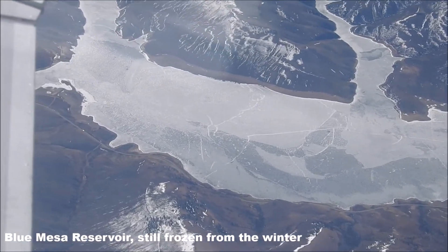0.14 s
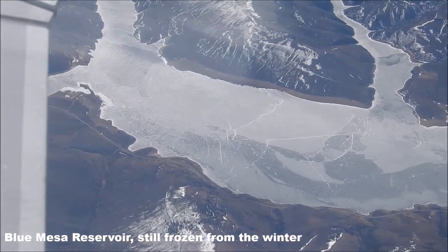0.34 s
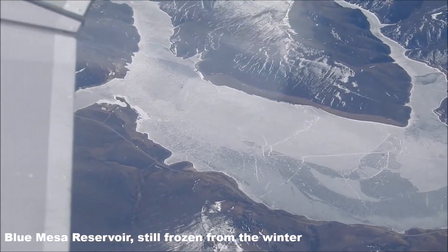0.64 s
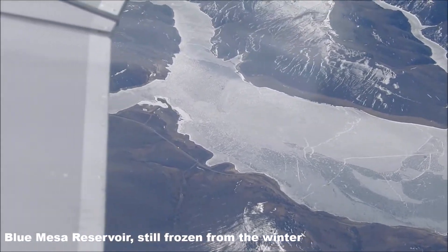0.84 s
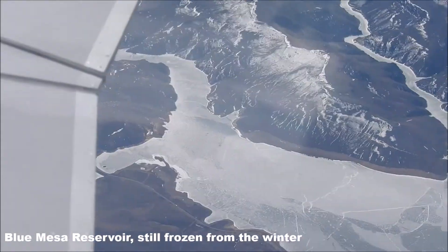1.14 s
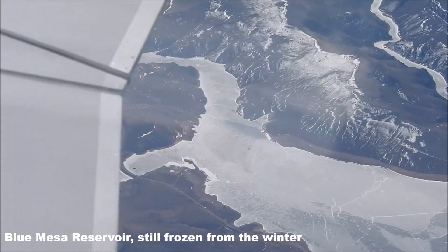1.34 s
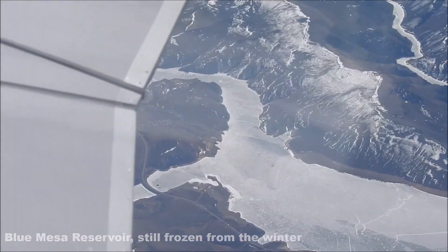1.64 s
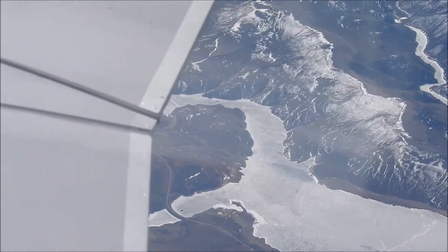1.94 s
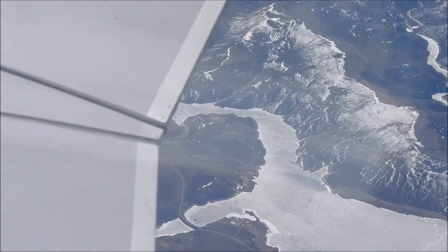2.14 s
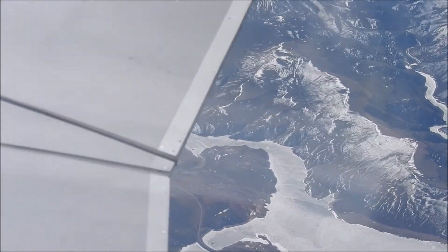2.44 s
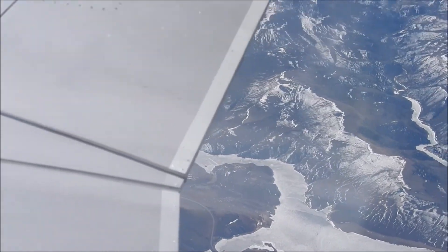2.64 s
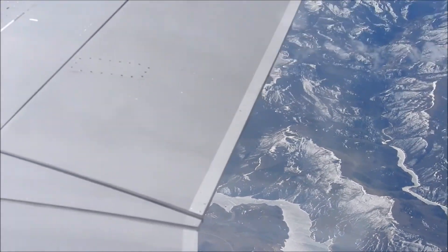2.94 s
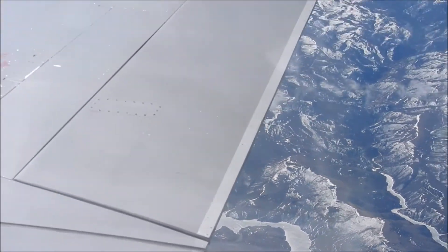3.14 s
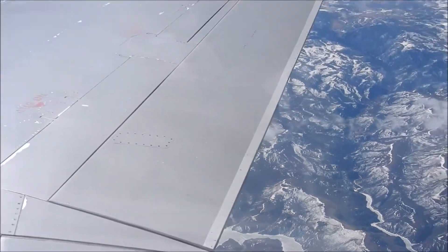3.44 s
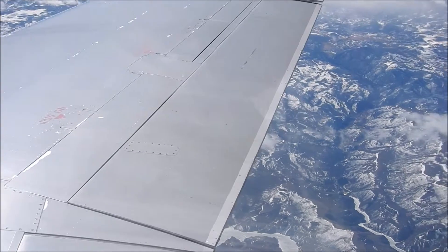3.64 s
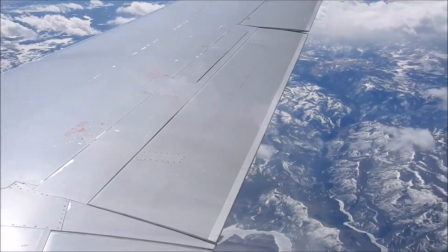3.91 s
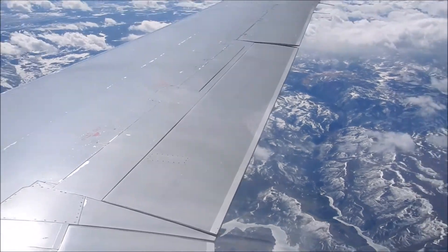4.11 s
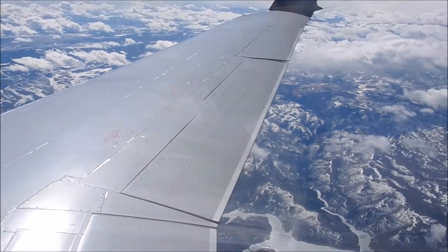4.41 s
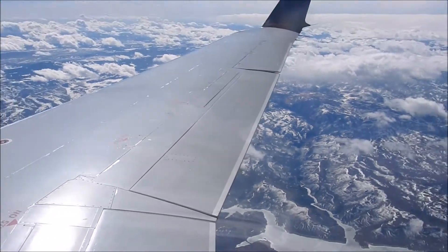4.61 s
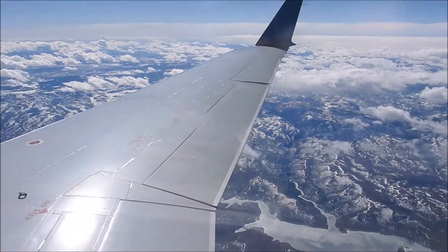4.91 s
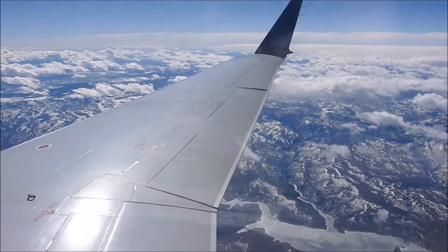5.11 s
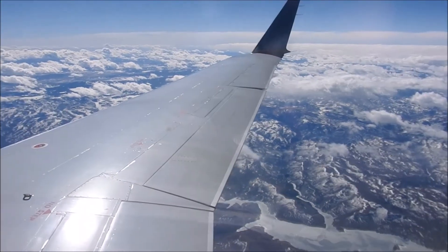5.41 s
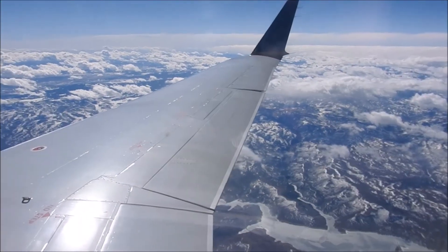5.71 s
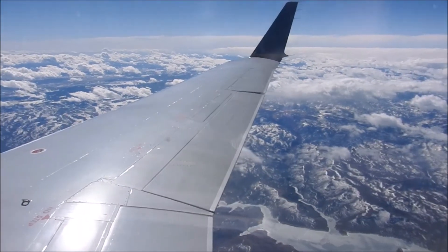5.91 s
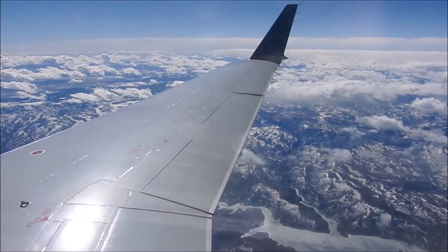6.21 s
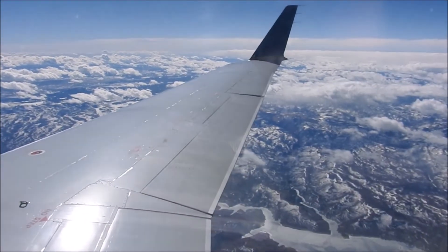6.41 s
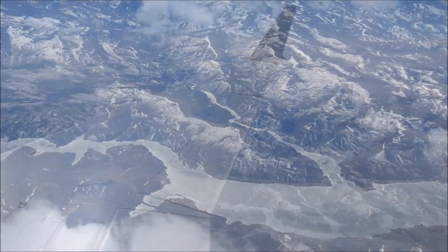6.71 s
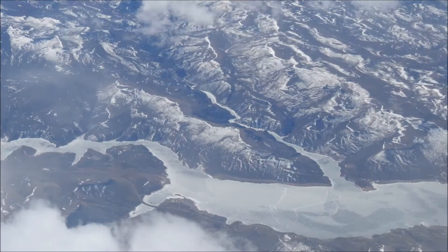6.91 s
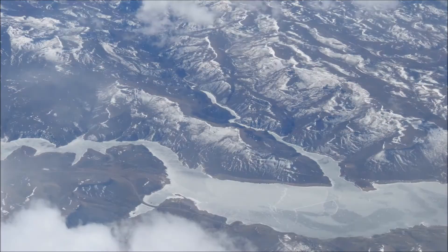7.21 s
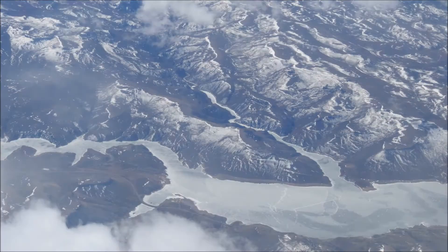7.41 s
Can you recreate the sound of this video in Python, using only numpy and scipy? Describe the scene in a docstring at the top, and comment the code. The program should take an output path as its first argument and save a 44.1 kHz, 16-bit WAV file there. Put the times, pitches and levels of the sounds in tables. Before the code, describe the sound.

Steady jet cabin noise: heavy rushing air, deep humming engines and thin vent hiss, slightly gritty, fading to silence after two faint scuffs.

```python
"""A window seat in a small jet at cruise: dull airflow roar, engine drone, vent hiss with a faint whine.
Roar, rush and hiss are shaped noise through cabin resonances; the drone is four fluttering sines.
A brief squeak and two soft scuffs are short noise bursts. Crests are gritty, rounded and crackle
slightly; the scuffs pass as the whole sound is faded out."""
import sys
import numpy as np
from scipy import signal
from scipy.fft import rfft, irfft
from scipy.io import wavfile
from scipy.ndimage import uniform_filter1d

SR = 44100
rng = np.random.default_rng(int(sys.argv[2]) if len(sys.argv) > 2 else 0)


def pcm_store(signal):
    """Save signal as 16-bit PCM."""
    levels = np.round(np.clip(np.atleast_2d(signal), -1, 1) * 32767)
    wavfile.write(sys.argv[1], SR, levels.astype(np.int16).T)


N = 332955

# faint squeak of the cabin trim: (time [s], length [s], frequency [Hz], width [Hz], level [dB])
TRIM_SQUEAK = (3.222, .04, 3220, 160, -44)
# soft scuffs, before the fade: (time [s], length [s], level [dB])
SCUFFS = [(5.811, 0.045, -27), (6.307, 0.049, -25)]
# scuff spectrum shape: (frequency [Hz], relative level [dB])
SCUFF_COLOUR = [(400, -2), (1100, 7.5), (2200, -3), (3200, -10.5), (4500, -16), (8000, -27), (15000, -39)]
# vent hiss before resonances: (frequency [Hz], density [dB per Hz])
VENT_SPECTRUM = [(1500, -97.5), (3000, -81), (3600, -93.5), (4100, -87), (4500, -80), (5500, -88.5),
                 (5950, -83), (6900, -88.5), (8000, -95.5), (9200, -101), (15500, -108)]
# rush of opposite sign left and right, before whistles: (frequency [Hz], density [dB per Hz])
DIFFUSE_SPECTRUM = [(30, -89), (120, -75), (500, -69), (1200, -69), (1400, -74), (2150, -77), (2450, -83),
                    (2900, -85.5), (3500, -98.5), (4500, -86), (5400, -89), (6000, -83.5), (7000, -86),
                    (8200, -114)]
# broad resonances of cabin and panels: (frequency [Hz], width [Hz], lift [dB])
CABIN_MODES = [(189, 28, 4), (212.6, 27, 4), (389.3, 26, 4.5), (649.7, 41, 5.5), (1250, 100, 1.5),
               (1580, 150, 3), (1995, 250, 5), (3250, 160, 3), (6660, 100, 5.5)]
# thin whistles in the air system: (frequency [Hz], width [Hz], lift [dB])
WHISTLE_MODES = [(3690, 35, 3), (3780, 35, 4), (3870, 35, 5), (3977, 26, 9), (6790, 14, 10)]
# engine tones: (frequency [Hz], rms level [dB], flutter [dB], phase wander [rad])
ENGINE_TONES = [(101.85, -17.4, 1, .1), (256.23, -15.5, .5, .05), (305.6, -38, 2, .5),
                (512.46, -38.5, 2, .4)]
# airflow through the cabin wall, before resonances: (frequency [Hz], density [dB per Hz])
ROAR_SPECTRUM = [(15, -63), (40, -52.5), (66, -46), (118, -39.5), (150, -42), (290, -46), (440, -45),
                 (540, -50), (780, -50.5), (1080, -60), (1750, -69), (2200, -71), (3600, -85), (8000, -112)]
# tick spectrum shape: (frequency [Hz], gain [dB])
TICK_COLOUR = [(400, -7.5), (1500, 15), (4000, 16), (8000, 7), (12000, 3), (15500, 1)]
# clearest ticks of the crackle: (time [s])
CLEAR_TICKS_S = [0.236, 1.1, 2.561, 3.33, 3.576, 4.712]

LEFT_MINUS_RIGHT_DB = -0.97
FADE_START_S, FADE_END_S, STOP_S = 2.72, 6.775, 6.752
TOP_HZ = 15750
# crackle: heights with full scale 1, pulse levels before the tick colour
FAINT_HEIGHT, FAINT_TICK_DB = 0.46, -42.5
BRIGHT_HEIGHT, BRIGHT_TICK_DB = 0.875, -24.5
FAINT_SCATTER_DB = 3

TIME_S = np.arange(N) / SR
FREQ_HZ = np.fft.rfftfreq(N, 1 / SR)


def undb(db):
    """Decibels to amplitude gain."""
    return 10 ** (np.asarray(db) / 20)


def slope(points):
    """Gain at every frequency from (Hz, dB) points joined on a log axis."""
    hz, db = np.transpose(points)
    return undb(np.interp(np.log(FREQ_HZ + 1e-9), np.log(hz), db))


def resonances(modes):
    """Gain at every frequency from bell-shaped lifts; width spans half the dB lift."""
    lift_db = sum(db * 2 ** -(2 * (FREQ_HZ - hz) / width_hz) ** 2 for hz, width_hz, db in modes)
    return undb(lift_db)


def noise(gain):
    """Random noise with the given amplitude per root Hz."""
    white = rfft(rng.standard_normal(N))
    return irfft(white * gain, N) * np.sqrt(SR / 2)


def walk(rate_hz):
    """Smooth random motion with rms 1, moving about rate_hz times a second."""
    y = noise(np.exp(-(FREQ_HZ / rate_hz) ** 2))
    return y / np.sqrt(np.mean(y ** 2))


def squeak():
    """A plastic panel slips for a moment and rings in one narrow band."""
    start_s, length_s, hz, width_hz, db = TRIM_SQUEAK
    ring = noise(np.exp(-(2 * (FREQ_HZ - hz) / width_hz) ** 2))
    swell = np.exp(-(2 * (TIME_S - start_s) / length_s) ** 2)  # centred on start_s
    return undb(db) * ring / np.std(ring) * swell


def scuffs():
    """Short grainy rubs: coloured noise with fast level flicker, gated by soft-edged windows."""
    rub = noise(slope(SCUFF_COLOUR)) * undb(2.5 * walk(250))
    touch = np.zeros(N)
    for start_s, length_s, db in SCUFFS:
        touch += undb(db) * ((TIME_S > start_s) & (TIME_S < start_s + length_s))
    return rub / np.std(rub) * uniform_filter1d(touch, size=400)


def vent_hiss(ring):
    """The air vents hiss evenly through the cabin resonances and whistles."""
    return noise(slope(VENT_SPECTRUM) * ring)


def diffuse_rush():
    """Short waves arrive from all around: noise of opposite sign left and right."""
    side = noise(slope(DIFFUSE_SPECTRUM) * resonances(WHISTLE_MODES))
    return side * np.array([[1], [-1]])


def engines(flutter_rate_hz=6, wander_rate_hz=3):
    """Fan and core shafts hold their speed; their tones flutter a little on the way through the frame."""
    drone = np.zeros(N)
    for hz, rms_db, flutter_db, wander_rad in ENGINE_TONES:
        phase = 2 * np.pi * (hz * TIME_S + rng.random()) + wander_rad * walk(wander_rate_hz)
        level = undb(rms_db + flutter_db * walk(flutter_rate_hz))
        drone += np.sqrt(2) * level * np.sin(phase)
    return drone


def fuselage_airflow(ring, buffet_db=0.8, buffet_rate_hz=12, eddy_db=1.6, eddy_rate_hz=45, split_hz=600):
    """Big eddies sway the low roar; small ones ruffle the rush above it."""
    high_share = 1 / (1 + (split_hz / (FREQ_HZ + 1)) ** 4)  # share of power
    colour = slope(ROAR_SPECTRUM) * ring
    roar = noise(colour * np.sqrt(1 - high_share)) * undb(buffet_db * walk(buffet_rate_hz))
    rush = noise(colour * np.sqrt(high_share)) * undb(eddy_db * walk(eddy_rate_hz))
    return roar + rush


def scene():
    """The cabin, a little louder on the right."""
    ring = resonances(CABIN_MODES) * resonances(WHISTLE_MODES)
    air = vent_hiss(ring) + diffuse_rush() + fuselage_airflow(ring)
    balance = undb(np.array([[LEFT_MINUS_RIGHT_DB], [-LEFT_MINUS_RIGHT_DB]]) / 2)
    return (squeak() + scuffs() + engines() + air) * balance


def grit(x, knee=0.084, edge_hz=900):
    """The signed square of what passes the knee, high-passed: the rush turns gritty on drone peaks."""
    mid = x.mean(axis=0)
    excess = mid - np.clip(mid, -knee, knee)
    highs = signal.butter(1, edge_hz, "high", fs=SR, output="sos")
    return signal.sosfiltfilt(highs, excess * np.abs(excess))


def ticks(x):
    """Dry ticks: faint on the flanks of tall crests, bright on the tallest and at a few set moments."""
    mid = x.mean(axis=0)
    height = np.abs(mid)
    sizes = undb(FAINT_SCATTER_DB * np.clip(rng.standard_normal(N), -2, 2))
    flanks = np.abs(np.diff(1. * (height > FAINT_HEIGHT), prepend=0))  # 1 at each crossing
    pulses = undb(FAINT_TICK_DB) * sizes * flanks
    tallest, _ = signal.find_peaks(height, height=BRIGHT_HEIGHT, distance=SR // 500)  # 2 ms apart
    clearest = (np.array(CLEAR_TICKS_S) * SR).astype(int)
    pulses[np.union1d(tallest, clearest)] = undb(BRIGHT_TICK_DB)
    return irfft(rfft(np.sign(mid) * pulses) * slope(TICK_COLOUR), N)


def record(dry):
    """Crests turn gritty, round off below full scale and crackle; a straight fade stops; the top is cut."""
    fade = np.interp(TIME_S, [FADE_START_S, FADE_END_S], [1, 0]) * (TIME_S < STOP_S)
    gritty = dry + grit(dry)
    rounded = gritty / (1 + (gritty / 0.93) ** 8) ** (1 / 8)  # ceiling 0.93
    top_cut = signal.ellip(10, 0.1, 80, TOP_HZ, fs=SR, output="sos")
    return signal.sosfilt(top_cut, (rounded + ticks(rounded)) * fade)


dry = scene()
out = record(dry)
pcm_store(out)
```